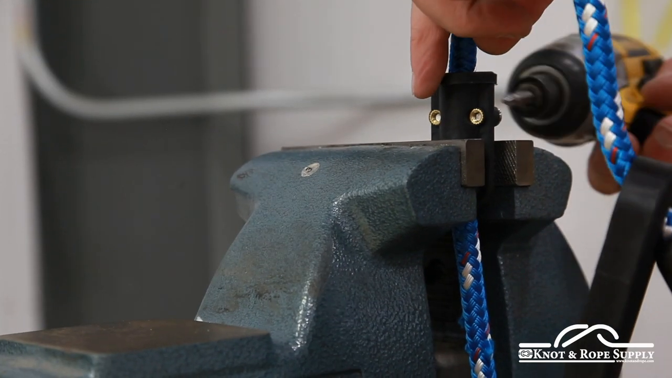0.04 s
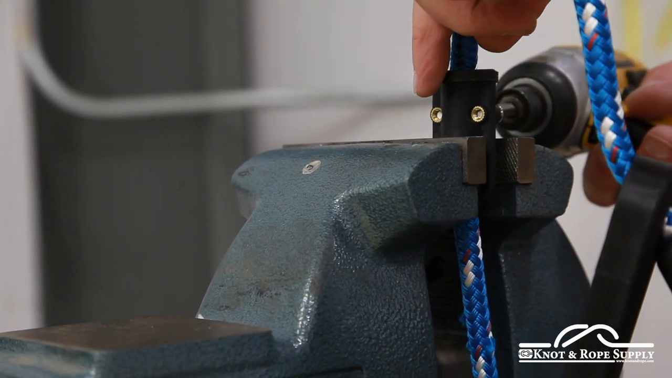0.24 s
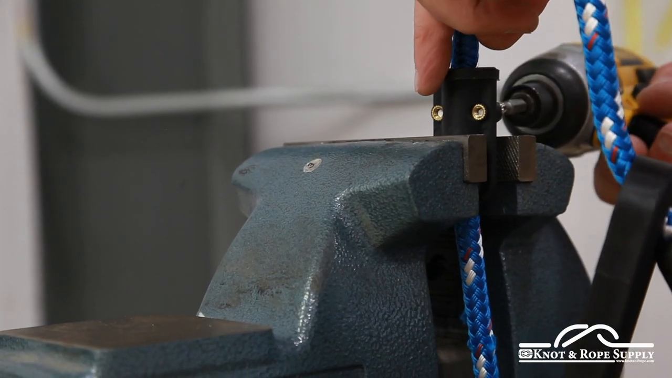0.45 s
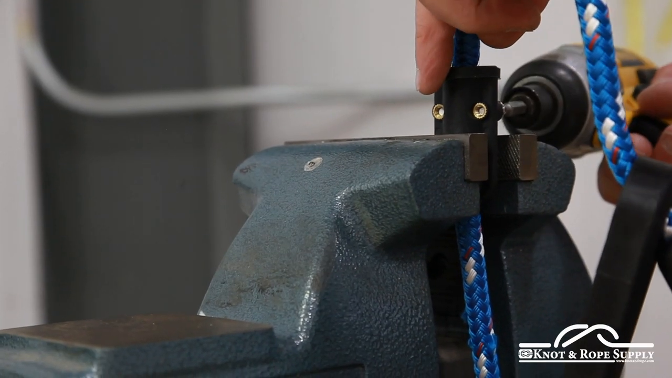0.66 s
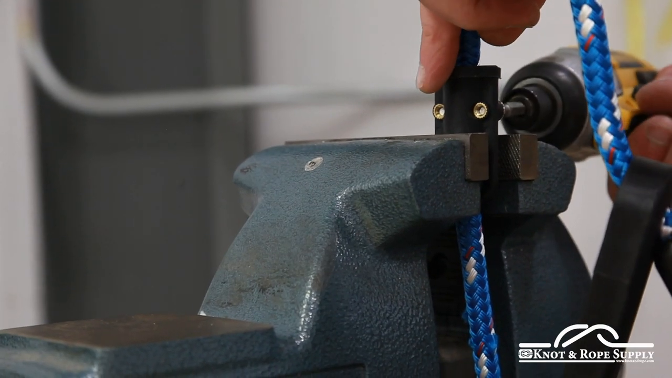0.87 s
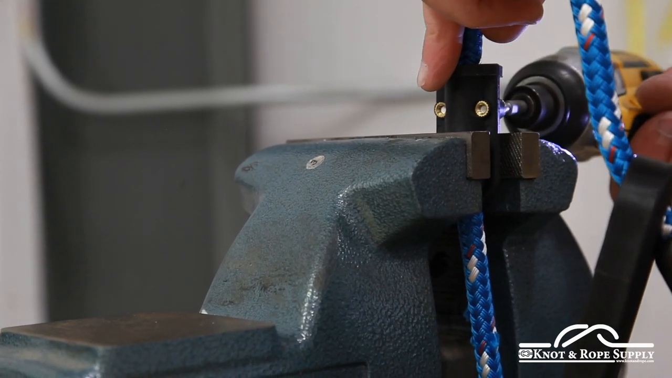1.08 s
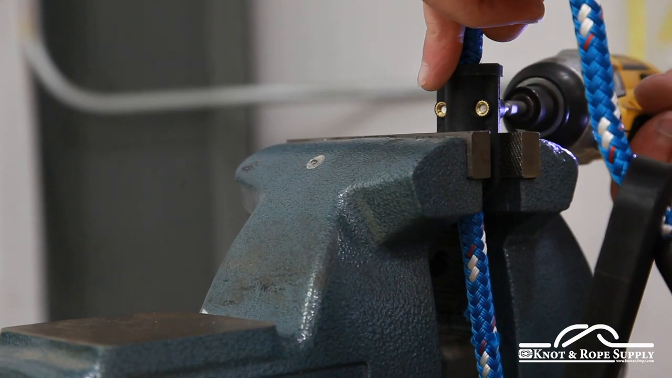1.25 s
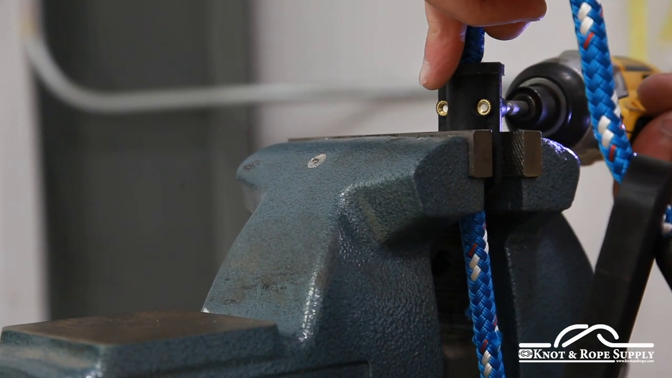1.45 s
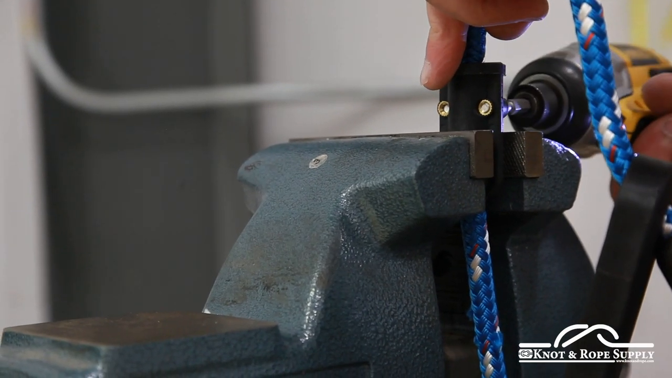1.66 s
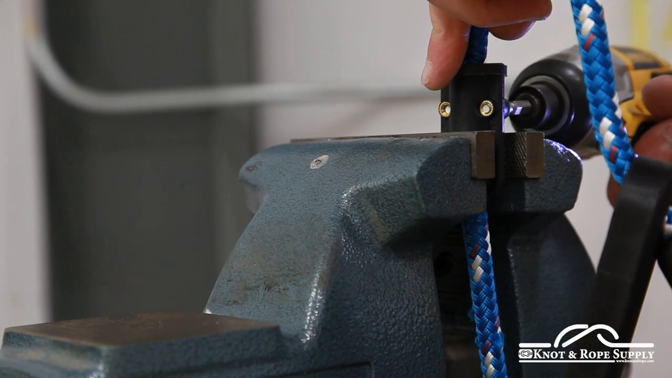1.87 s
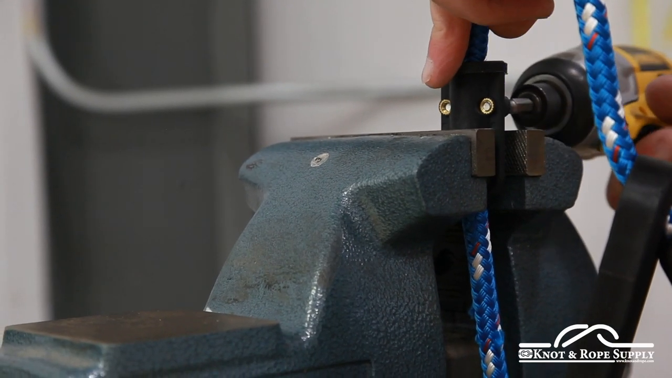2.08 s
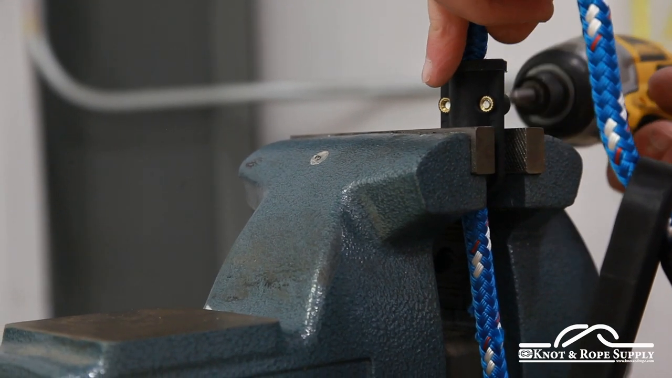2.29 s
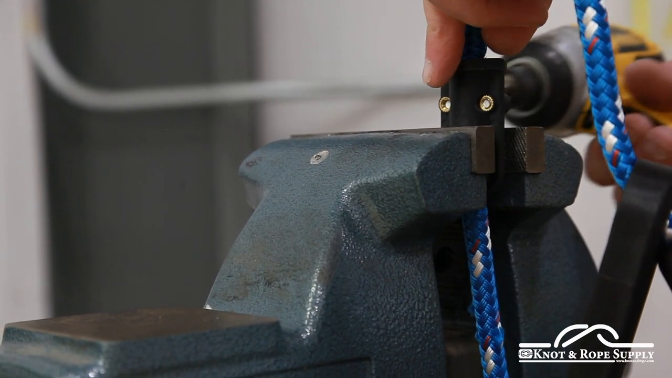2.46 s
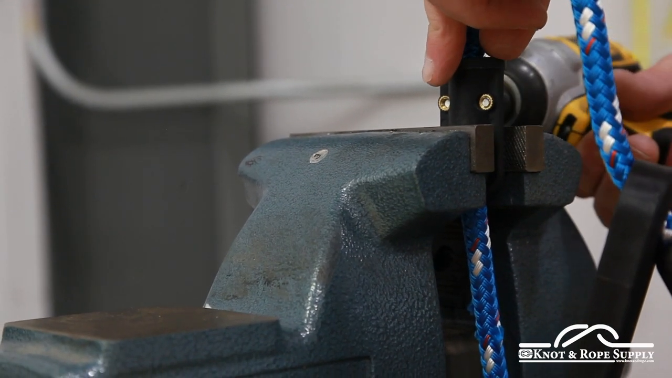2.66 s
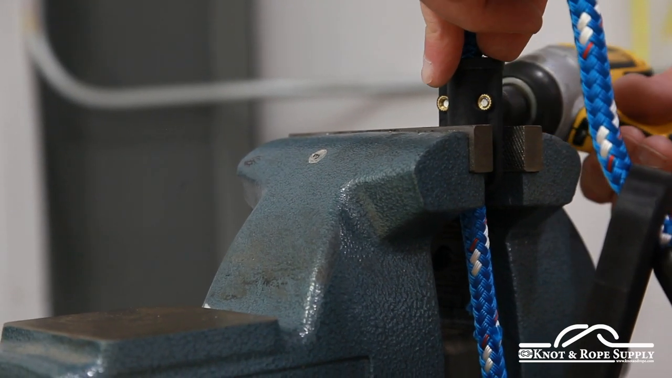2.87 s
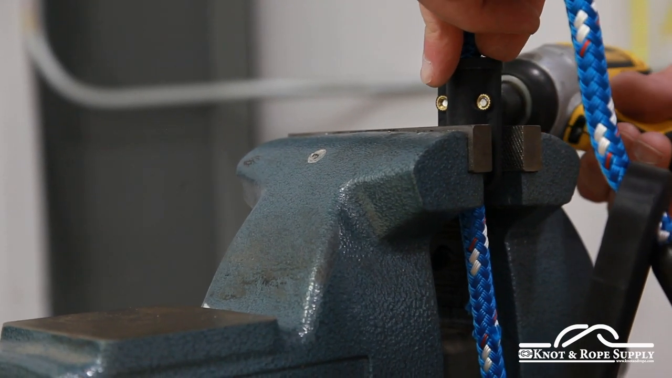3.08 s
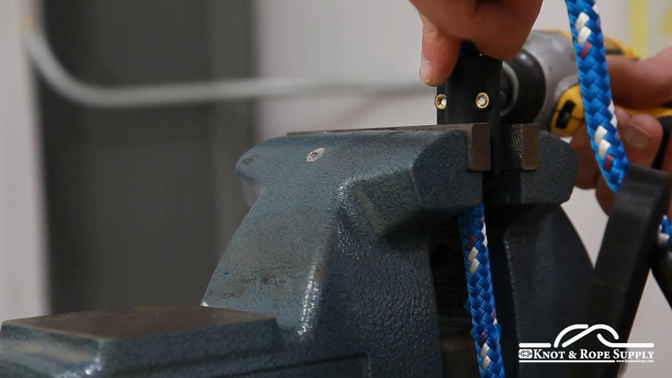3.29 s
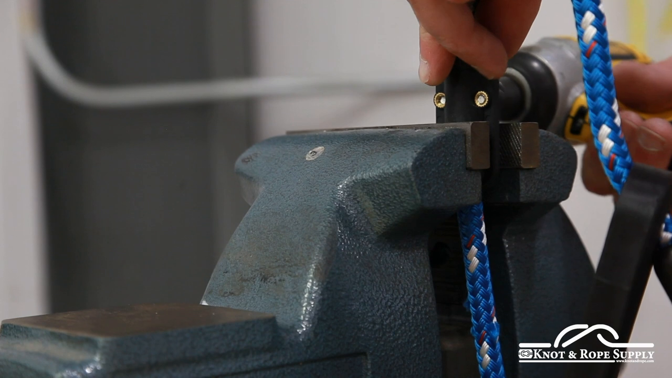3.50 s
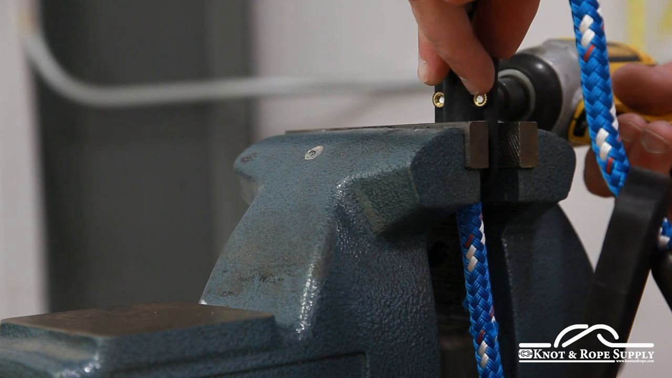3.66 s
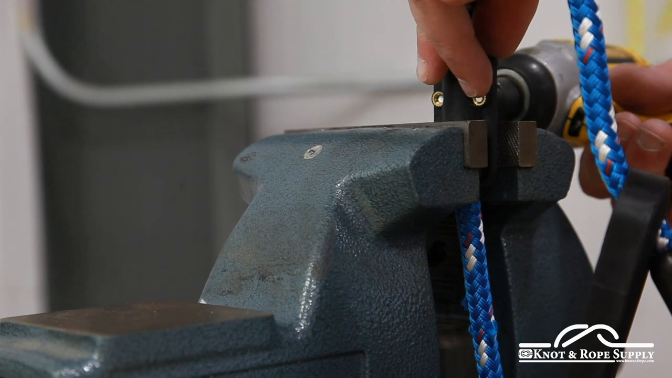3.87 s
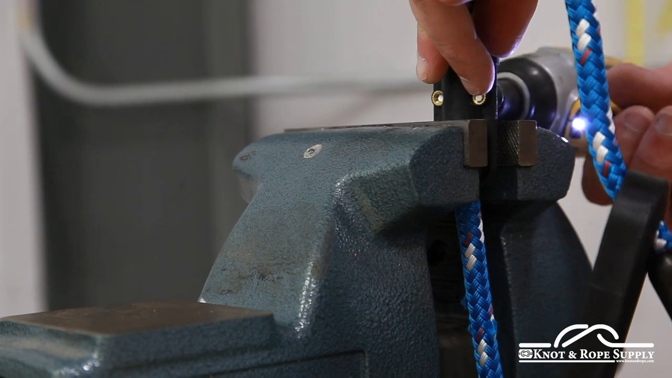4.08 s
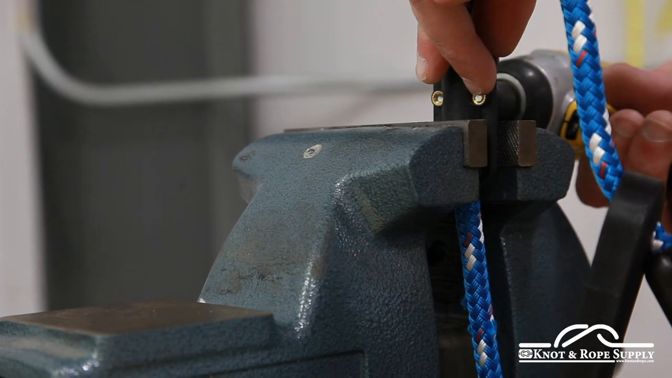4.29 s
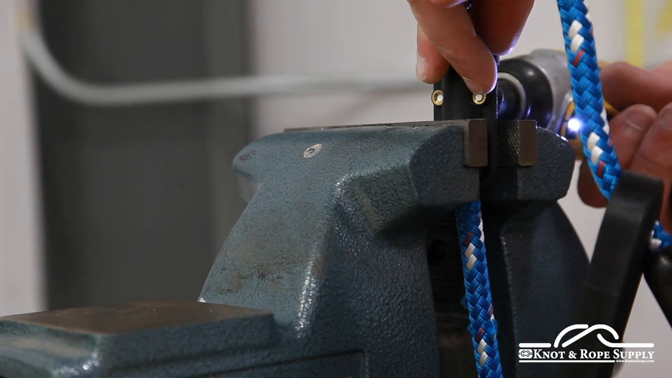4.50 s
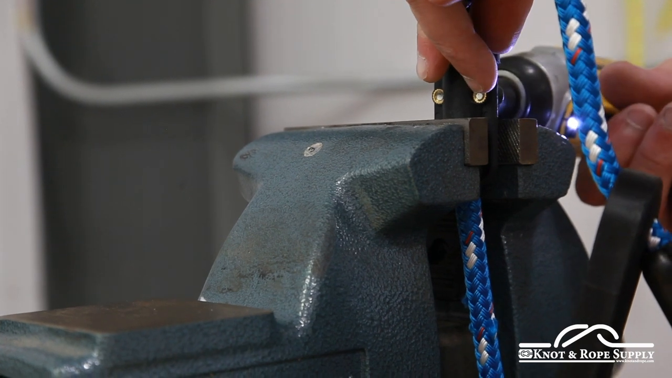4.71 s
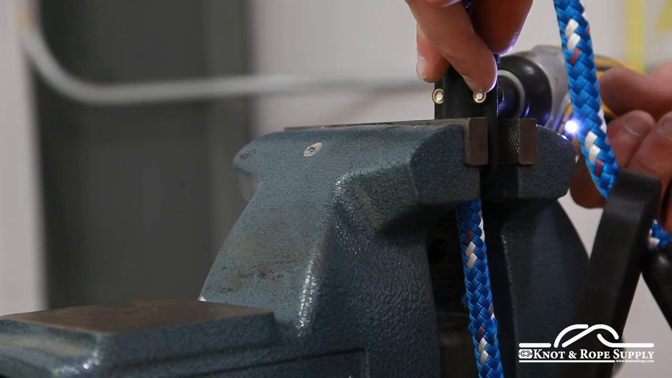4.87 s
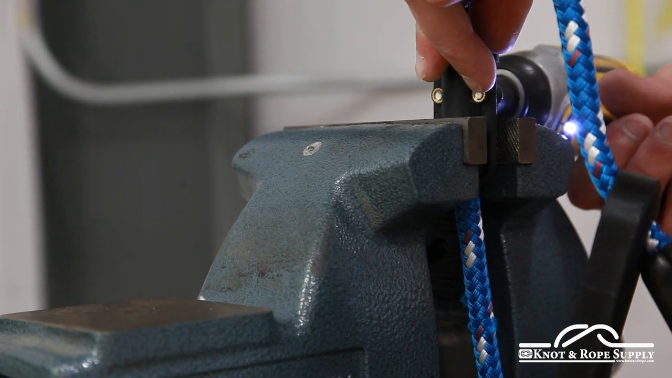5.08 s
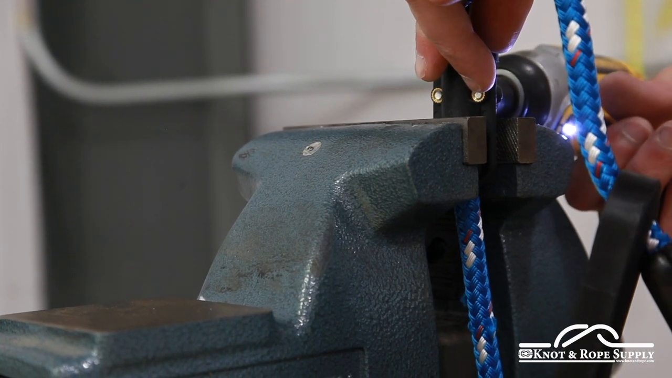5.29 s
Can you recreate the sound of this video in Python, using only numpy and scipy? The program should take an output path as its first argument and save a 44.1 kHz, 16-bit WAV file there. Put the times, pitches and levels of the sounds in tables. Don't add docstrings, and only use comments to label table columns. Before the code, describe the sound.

A cordless drill whines and rattles in two bursts in a hard workshop, with small metal ticks and a heavy distorted bench thump between them.

```python
import sys
import numpy as np
from scipy import signal
from scipy.fft import rfft, irfft, next_fast_len
from scipy.io import wavfile

SR = 44100
rng = np.random.default_rng(int(sys.argv[2]) if len(sys.argv) > 2 else 0)


def voltage_ratio(level):
    return 10 ** (np.asarray(level, float) / 20)


def generate_wav(sig):
    pcm = np.round(np.clip(np.atleast_2d(sig).T, -1, 1) * 32767).astype(np.int16)
    wavfile.write(sys.argv[1], SR, pcm)


N = 235714
TIME = np.arange(N) / SR

# time in seconds, rotor turns per second, gear rattle in dB.
RUNS = [
    [(.985, 120, -51), (1.04, 250, -28), (1.095, 304, -27.5), (1.26, 324, -28), (1.442, 309, -25.5),
     (1.47, 265, -26.5), (1.53, 230, -33.5), (1.575, 150, -46.5), (1.64, 58, -64)],
    [(1.752, 150, -40.5), (1.79, 180, -27.5), (1.915, 250, -24)],
    [(4.062, 90, -63.5), (4.13, 100, -36.5), (4.16, 105, -32), (4.19, 110, -36), (4.28, 125, -35),
     (4.31, 130, -61)],
    [(4.32, 190, -41), (4.445, 200, -35.5), (4.478, 290, -26), (4.555, 424, -22.5), (4.666, 413, -23),
     (4.71, 362, -23.5), (4.78, 240, -25.5), (4.94, 130, -36), (5.28, 52, -51)],
    [(5.305, 150, -31.5), (5.333, 280, -26.5), (5.345, 260, -14.5)],
]


def rms_one(x):
    return x / np.sqrt(np.mean(x ** 2) + 1e-20)


def in_time(rows, silent=-120):
    s, *columns = np.transpose(rows)
    return [np.interp(TIME, s, c, left=silent, right=silent) for c in columns]


def at_hz(points, hz):
    points_hz, value = np.transpose(points)
    return np.interp(np.log(np.maximum(hz, 1)), np.log(points_hz), value)


def colour(x, points):
    size = next_fast_len(N + 8192)
    fold = irfft(np.log(voltage_ratio(at_hz(points, np.arange(4097) * SR / 8192))))
    fold[1:4096] *= 2
    fold[4097:] = 0
    impulse = irfft(np.exp(rfft(fold)))
    return rms_one(irfft(rfft(x, size) * rfft(impulse, size), size)[:N])


def band(x, low_hz, high_hz):
    return signal.sosfilt(signal.butter(2, [low_hz, high_hz], "band", fs=SR, output="sos"), x)


def drift(rate_hz):
    r = np.exp(-2 * np.pi * rate_hz / SR)
    return rms_one(signal.lfilter([1], [1, -2 * r, r * r], rng.standard_normal(N + SR))[SR:])


def ring(clicks, hz, t60_s):
    r, w = voltage_ratio(-60 / (t60_s * SR)), 2 * np.pi * hz / SR
    return signal.lfilter([0, np.sin(w)], [1, -2 * r * np.cos(w), r * r], clicks + 1e-18)


def strike(times_s, db, modes, spread_db):
    at, out = (np.array(times_s) * SR).astype(int), np.zeros(N)
    luck = rng.standard_normal((len(at), len(modes)))
    for k, (hz, level_db, t60_s) in enumerate(modes):
        clicks = np.zeros(N)
        clicks[at] = voltage_ratio(db + level_db + spread_db * luck[:, k])
        out += ring(clicks, hz, t60_s) * (-1) ** k
    return out


def bursts(times_s, db, t60_s):
    clicks = np.zeros(N)
    clicks[(np.array(times_s) * SR).astype(int)] = voltage_ratio(db)
    return signal.lfilter([1], [1, -voltage_ratio(-60 / (t60_s * SR))], clicks)


def whine():
    # time in seconds, pitch in Hz, level in dB.
    stretches = [
        [(1.03, 6280, -43), (1.08, 6290, -36), (1.466, 6300, -35), (1.52, 6230, -34.5), (1.6, 6000, -47.5),
         (1.7, 6220, -37), (1.728, 6260, -32), (1.731, 6000, -41), (1.75, 5980, -51.5)],
        [(1.757, 5980, -40), (1.768, 6000, -35), (1.79, 6000, -41.5), (1.865, 5980, -37.5), (1.875, 6030, -44),
         (1.915, 5790, -58)],
        [(4.462, 6000, -40), (4.5, 5950, -52), (4.55, 6070, -56), (4.69, 6060, -37.5), (4.85, 6077, -34.5),
         (5.14, 6050, -34), (5.299, 6000, -41)],
        [(5.298, 5500, -26), (5.307, 5500, -26), (5.312, 5500, -38), (5.345, 5500, -33)],
    ]
    # share of pitch climbed at the pull, climb time in seconds, unsteadiness share, octave in dB.
    pulls = [
        (.3, 0.013, 0.0017, -56),
        (0.29, .007, .002, -54.5),
        (.21, 0.024, .0006, -64),
        (.64, .017, .04, -48),
    ]
    # start in seconds, length in seconds, pitch in Hz, level in dB,
    # stumble delay in seconds.
    feathers = [
        (0.971, .03, 6770, -40, .019),
        (4.062, .2, 6760, -43, 0.026),
    ]
    # time in seconds, pitch drop in Hz.
    bites = [
        (1.09, 230),
        (1.148, 230),
        (1.215, 101.1),
        (1.313, 210),
        (1.524, 90),
        (1.617, 90),
    ]
    fade_in_db, fade_in_s = -19, 0.0028
    stumble_hz, stumble_db, stumble_width_s = 545, -3, 0.007
    sag_hz_per_s, release_s = 570, 0.0083
    grip_s, recovery_s, bite_db_per_hz = .004, .025, -0.03

    load, flutter = drift(170), voltage_ratio(1.5 * drift(90))
    hz, first, octave = np.zeros((3, N))
    for rows, (climb, climb_s, waver, octave_db) in zip(stretches, pulls):
        pitch_hz, first_db = in_time(rows)
        held = pitch_hz > 0
        since_s = np.maximum(TIME - rows[0][0], 0)
        first_db += (climb > 0) * fade_in_db * np.exp(-since_s / fade_in_s)
        pitch_hz = pitch_hz * (1 - climb * np.exp(-since_s / climb_s)) * (1 + waver * load)
        hz = np.where(held, pitch_hz, hz)
        first = np.where(held, voltage_ratio(first_db), first)
        octave = np.where(held, voltage_ratio(octave_db), octave)

    for start_s, length_s, pitch_hz, db, stumble_s in feathers:
        held = (TIME >= start_s) & (TIME < start_s + length_s)
        since_s = TIME - start_s
        dip = np.exp(-((since_s - stumble_s) / stumble_width_s) ** 2)
        sung_hz = (pitch_hz - sag_hz_per_s * since_s - stumble_hz * dip) * (1 + 0.01 * load)
        level = voltage_ratio(db + stumble_db * dip) * np.clip((length_s - since_s) / release_s, 0, 1)
        hz = np.where(held, sung_hz, hz)
        first = np.where(held, level, first)
        octave = np.where(held, level * voltage_ratio(-24), octave)

    drop_hz = np.zeros(N)
    for bite_s, depth_hz in bites:
        since_s = TIME - bite_s
        grip = np.clip(since_s / grip_s + 1, 0, 1)
        drop_hz += depth_hz * grip * np.exp(-np.maximum(since_s, 0) / recovery_s)
    first = first * voltage_ratio(-bite_db_per_hz * drop_hz)
    phase = 2 * np.pi * np.cumsum(hz - drop_hz) / SR
    return np.sqrt(2) * flutter * (first * np.sin(phase) + octave * np.sin(2 * phase))


def motor():
    per_s = np.maximum(in_time(sum(RUNS, []), silent=0)[0], 50)
    turns = np.cumsum(per_s * (1 + .008 * drift(40))) / SR
    return gears_and_fan(per_s, turns) + rotor_hum(per_s, turns)


def gears_and_fan(per_s, turns):
    # centre in Hz, width in Hz, level in dB.
    resonances = [(790, 110, -15.5), (1667, 45, -5.5), (2260, 130, 1), (2680, 220, -2), (2865, 260, 4),
                  (3430, 416, -3.5)]
    # frequency in Hz, density in dB per Hz.
    gear_tone = [(180, -57.5), (300, -21), (353, -2), (527, -10.5), (860, 3.5), (1130, -7.5), (2290, 4.5),
                 (4910, -15.5), (6000, -44), (7800, -44), (13200, -120)]
    # frequency in Hz, density in dB per Hz.
    fan_tone = [(2350, -16), (4000, -3), (5740, -1), (7670, -3), (10800, -14), (14100, -14.5), (15500, -17)]
    fan_levels_db = [-14, -15.5, -10, -12.5, -14]
    fan_db_per_octave = 3

    once_share = .5 * (per_s / 400) ** 2
    once = (np.diff(np.floor(turns), prepend=0) > 0) * voltage_ratio(3.5 * rng.standard_normal(N).clip(-2, 1.5))
    beat = 1 + 0.22 * np.cos(2 * np.pi * turns)
    knocks_per_s = 14 * per_s
    teeth = (rng.random(N) < knocks_per_s / SR) * voltage_ratio(2.5 * rng.exponential(1, N).clip(0, 3))
    teeth = teeth * rng.choice([-1, 1], N) / np.sqrt(knocks_per_s)
    clumps = voltage_ratio(1.3 * drift(80) + .8 * drift(30))
    teeth = (rms_one(teeth) * beat + once_share * once * np.sqrt(SR / per_s)) * clumps

    tuned = np.zeros(N)
    for k, (hz, width_hz, db) in enumerate(resonances):
        tuned += voltage_ratio(db) * rms_one(ring(teeth, hz, 2.9 / width_hz)) * np.sqrt(width_hz) * (-1) ** k
    housing = rms_one(0.79 * rms_one(tuned) + 0.71 * colour(teeth, gear_tone))
    fan = colour(rng.standard_normal(N) * beat * clumps + 0.067 * teeth, fan_tone)

    out = np.zeros(N)
    for rows, fan_db in zip(RUNS, fan_levels_db):
        housing_db = in_time(rows)[1]
        fan_db = fan_db + fan_db_per_octave * np.log2(per_s / 300)
        out += voltage_ratio(housing_db + 0.3) * housing + voltage_ratio(housing_db + fan_db + 2.5) * fan
    return out


def rotor_hum(per_s, turns):
    # multiple of rotor speed, level over the hum in dB.
    multiples = [(2, 3), (3, -10), (4, 5), (5, -2)]
    window_centres_hz, window_width_hz = (860, 1660), 150
    db_at_300_turns, db_per_octave = -39.5, 7
    full_turns_per_s, fall_db_per_turn = 285, .55
    carrier_ratio = 1.13

    running = np.max([in_time(rows)[0] > 0 for rows in RUNS], axis=0)
    hum_db = db_at_300_turns + db_per_octave * np.log2(per_s / 300)
    hum_db = hum_db - fall_db_per_turn * np.maximum(full_turns_per_s - per_s, 0)
    hum_db = np.where(running, hum_db, -120)
    out = np.sqrt(2) * voltage_ratio(hum_db + 1.8 * drift(37)) * np.sin(2 * np.pi * carrier_ratio * turns)
    for multiple, db in multiples:
        window = sum(1 / (1 + ((multiple * per_s - hz) / window_width_hz) ** 4) for hz in window_centres_hz)
        level = window * voltage_ratio(hum_db + db + 2.9 * drift(27))
        out += np.sqrt(2) * level * np.sin(2 * np.pi * multiple * turns)
    return out


def contacts():
    # time in seconds, peak in dB, snap in dB.
    bit_ticks = [(0.4619, -35.5, -3.5), (.5324, -39, -2), (0.5538, -32.5, 1), (0.8682, -27, -7.5),
                 (2.6755, -36, -1.5), (2.836, -50, 5), (2.945, -49, -2), (2.992, -39, 2), (3.048, -35, 0.5),
                 (3.0975, -34.5, -6), (3.1078, -35, -5.5), (3.1518, -35.5, -12), (3.1952, -35, -8),
                 (3.2093, -31, -6), (3.2254, -40, -3.5), (3.3854, -43.5, 1), (3.6824, -44, -8),
                 (3.6914, -28.5, -8), (3.7034, -33.5, -4), (3.7324, -30, -14), (3.7507, -31.5, -1),
                 (4.2474, -42, 6), (4.432, -41.5, 8.5)]
    # time in seconds, peak in dB.
    dry_clicks = [(.4752, -29.5), (.855, -36), (1.0284, -10.5), (1.7547, -18.5), (2.9992, -28),
                  (3.0854, -27), (3.1408, -38.5), (3.907, -43.5), (3.9424, -43.5), (4.069, -30),
                  (4.0928, -33.5), (4.1111, -16.5), (4.1424, -28), (4.4484, -27)]
    # time in seconds, peak in dB.
    dull_bumps = [
        (.8832, -17),
        (.8924, -36),
        (2.1224, -12),
        (2.1924, -22),
        (3.0739, -35),
        (3.7604, -35.5),
    ]
    # time in seconds, peak in dB, body in dB, body pitch in Hz.
    casing_knocks = [(.486, -30, -3, 374), (.9106, -29, -2.5, 413), (.9414, -44.5, 9, 655),
                     (2.2783, -26.5, 4, 872), (2.2954, -27.5, 4, 247), (2.8676, -43, 2, 918),
                     (2.8844, -43.5, -2, 753), (3.0337, -38.5, 0, 695), (3.0571, -34.5, 0, 810),
                     (3.3184, -37.5, 4, 755), (3.7154, -35.5, 4, 580), (3.9793, -47, 3.5, 858),
                     (4.0164, -26, 5.5, 715), (4.156, -14.5, -2.5, 712), (4.1694, -25.5, 6.5, 646),
                     (4.3211, -34.5, 2, 740)]
    # frequency in Hz, level in dB, t60 in seconds.
    shell_modes = [(1553, -11, 0.075), (2020, 4.5, 0.032), (2240, 5, 0.022), (2950, 2, 0.029),
                   (3170, 0.5, .03), (4195, -57, 0.012)]
    # frequency in Hz, level in dB, t60 in seconds.
    edge_modes = [(6620, -4.5, 0.032), (7400, 5, 0.0094), (8880, 8.5, 0.0027), (10290, -25.5, 0.0023),
                  (11530, -35, 0.003), (14450, -5.5, .008)]

    # time in seconds, peak in dB, body in dB, body pitch in Hz, snap in dB.
    rows = [(s, db, -19.5, 720, -14) for s, db in dry_clicks]
    rows += [(s, db, -5, 370, -22.5) for s, db in dull_bumps]
    rows += [(s, db, -5, 713, snap_db) for s, db, snap_db in bit_ticks]
    rows += [(*row, -10) for row in casing_knocks]
    s, db, body_db, body_hz, snap_db = np.transpose(rows)

    noise = rng.standard_normal((3, N))
    snap = band(noise[0] * bursts(s, db + snap_db - 1, 0.019), 4700, 14000)
    snap += strike(s, db + snap_db - 13, edge_modes, spread_db=6)
    crack = bursts(s, db + 2, .015) + bursts(s, db - 7, .08)
    rattle = band(band(noise[1] * crack, 1700, 3800), 1500, 4200)
    rattle += strike(s, db - 20, shell_modes, spread_db=3)
    body = band(noise[2] * bursts(s, db + body_db + 0.5, 0.089), 195, 1500)
    after_s = np.arange(2600) / SR
    for at, level_db, hz in zip((s * SR).astype(int), db + body_db - 6.0, body_hz):
        knock = voltage_ratio(level_db - 60 * after_s / 0.078) * np.sin(2 * np.pi * hz * after_s)
        body[at:at + len(after_s)] += knock[:N - at]
    return snap + rattle + body


def bit_ring():
    # time in seconds, peak in dB.
    touches = [(0.533, -36), (0.5524, -39), (2.314, -36), (2.768, -57), (2.836, -57), (3.057, -34.5),
               (3.1945, -33), (3.4323, -64.5), (3.7524, -39), (3.7626, -49)]
    hz, t60_s = 13800, .04
    s, db = np.transpose(touches)
    return strike(s, db - 3, [(hz, 0, t60_s), (hz * 1.02, -4, t60_s / 2)], spread_db=1.5)


def bench():
    # time in seconds, level in dB.
    thumps = [
        (1.85, -6.5),
        (1.86, -4.5),
        (1.865, 1),
        (1.872, 3.5),
        (1.895, 1.5),
        (1.94, -7.5),
    ]
    # frequency in Hz, level in dB, t60 in seconds.
    modes = [(106, -20, 0.36), (132, -27.5, 0.29), (183.2, -3, 0.18), (241.5, -4, .12), (298, -5, 0.13),
             (338, -3.5, 0.11), (400, -12, 0.053), (845, -22.5, 0.018), (1200, -24.5, 0.025)]
    start_s, gap_s, first_db, loss_db = 1.96, .024, -9, 1.66
    rocks = [(start_s + gap_s * (k + rng.uniform(-.4, .4)), first_db - loss_db * k) for k in range(18)]
    s, db = np.transpose(thumps + rocks)
    return band(band(strike(s, db - 6, modes, spread_db=3.0), 85, 1200), 75, 1500)


def clatter():
    # start in seconds, level in dB, length in seconds.
    grips = [(1.916, -4, 0.011), (1.931, -14, 0.01), (1.94, -11, 0.017), (1.953, 0, 0.0095),
             (1.961, 8.5, 0.0099), (1.976, 7, .008), (1.986, -7, .011), (1.992, -14.5, 0.018),
             (2.091, -36, 0.016), (2.124, -27.5, 0.032)]
    # frequency in Hz, density in dB per Hz.
    tone = [(240, -57.5), (400, -3), (543, -12.5), (604, -7), (1260, -7.5), (1740, -2.5), (2220, -6.5),
            (3400, -2), (4690, -17.5), (15500, -20.5)]
    level = np.zeros(N)
    for start_s, db, length_s in grips:
        since_s = np.maximum(TIME - start_s, 0)
        level += voltage_ratio(db) * (TIME >= start_s) * np.exp(-(since_s / length_s) ** 3)
    return 0.67 * level * colour(rng.standard_normal(N) * voltage_ratio(0.57 * drift(350)), tone)


def room(x):
    # frequency in Hz, t60 in seconds.
    decay = [(100, .6), (500, .55), (2500, .6), (6000, .45), (10000, .28), (14000, .12)]
    size = next_fast_len(N + SR)
    hz = np.arange(size // 2 + 1) * SR / size
    t60_s, echo = at_hz(decay, hz), 0
    for k, lag_s in enumerate(rng.uniform(.02, .07, 24)):
        loop = voltage_ratio(-60 * lag_s / t60_s) * np.exp(-2j * np.pi * hz * lag_s)
        echo = echo + loop / (1 - loop) * (-1) ** k
    for lag_s in (.0013, .0031, .0053, .0089, .0137):
        delay = np.exp(-2j * np.pi * hz * lag_s)
        echo = echo * (delay - .6) / (1 - .6 * delay)
    return irfft(rfft(x, size) * echo, size)[:N] / np.sqrt(24)


def linger(x):
    r = voltage_ratio(-120 / SR)
    return np.sqrt(signal.lfilter([1 - r], [1, -r], x ** 2))


def air(near):
    # time in seconds, draught in dB.
    draught_levels = [(0, -48.5), (.2, -44), (.45, -52.5), (.93, -52.5), (1.65, -71.5), (2.5, -52.5),
                      (3.1, -55.5), (3.35, -60), (4.0, -63.5), (5.345, -51.5)]
    # frequency in Hz, density in dB per Hz.
    hiss_tone = [(470, -34.5), (851, -7), (1330, -5), (2130, -6.5), (3600, -2.5), (4600, -10), (7540, -19),
                 (15500, -34.5)]
    # frequency in Hz, density in dB per Hz.
    rumble_tone = [(12, -51), (20, -27), (60, 2.5), (92, 0.5), (162, -7), (285, -11), (344, -11.5),
                   (460, -18), (546, -15), (1200, -19), (1560, -48), (2640, -120)]
    hall_hiss_db, hall_rumble_db, rumble_over_hiss_db = -20, -12.5, -8
    far_start_s, far_db, far_fade_db_per_s = .85, -56, 1.0

    draught = voltage_ratio(in_time(draught_levels)[0])
    hiss = np.hypot(draught, voltage_ratio(hall_hiss_db) * linger(band(near, 1000, 5000)))
    hiss = hiss * voltage_ratio(0.62 * drift(6.6)) * colour(rng.standard_normal(N), hiss_tone)
    low = voltage_ratio(1.0 * drift(10)) * colour(rng.standard_normal(N), rumble_tone)
    swell = voltage_ratio(rumble_over_hiss_db) * draught + voltage_ratio(hall_rumble_db) * linger(band(near, 90, 470))
    rumble = voltage_ratio(-53.5) * low + swell * band(low, 90, 1500)
    far = (TIME > far_start_s) * voltage_ratio(far_db - far_fade_db_per_s * TIME + 1.4 * drift(6))
    far_tone = far * np.sin(2 * np.pi * 678 * TIME + 0.31 * drift(5))
    electronic = band(band(rng.standard_normal(N), 15450, 15650), 15450, 15650)
    return hiss + rumble + far_tone + voltage_ratio(-76) * rms_one(electronic)


def scene():
    near = whine() + motor() + contacts() + bit_ring() + bench() + clatter()
    room_db = -17.5
    return (near + voltage_ratio(room_db) * room(near) + air(near))[None]


def low_pass(x):
    return signal.sosfilt(signal.butter(12, 15610, fs=SR, output="sos"), x)


def record(dry):
    hard = dry / (1 + np.abs(dry) ** 8) ** (1 / 8)
    return low_pass(hard)


dry = scene()
out = record(dry)
generate_wav(out)
```